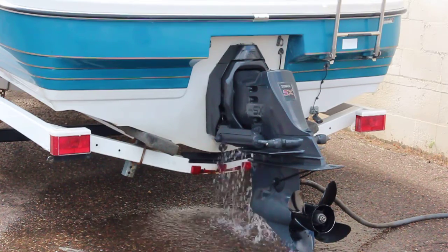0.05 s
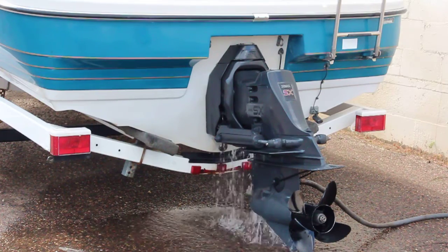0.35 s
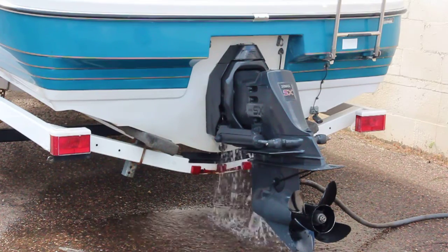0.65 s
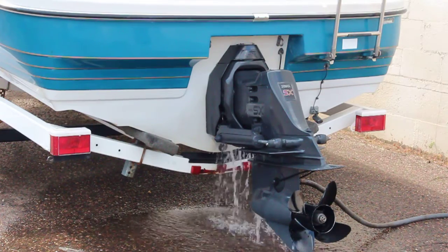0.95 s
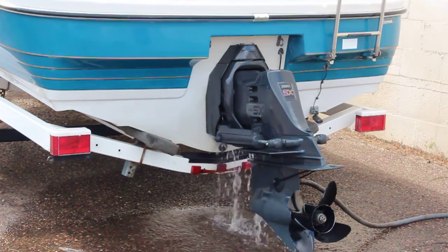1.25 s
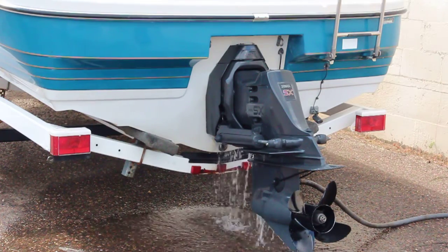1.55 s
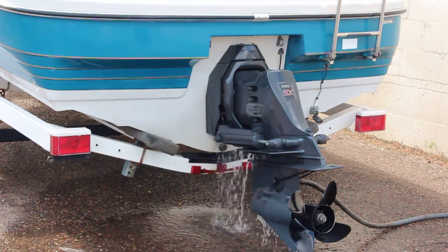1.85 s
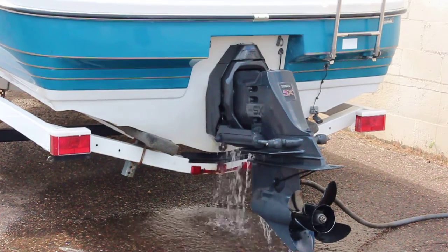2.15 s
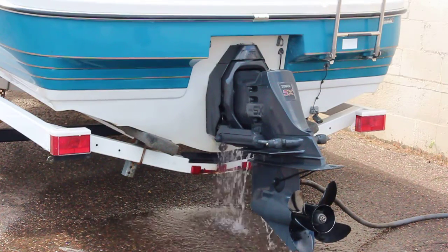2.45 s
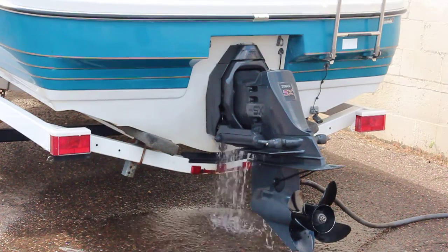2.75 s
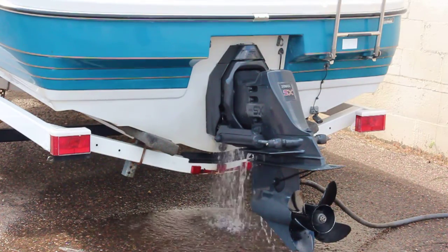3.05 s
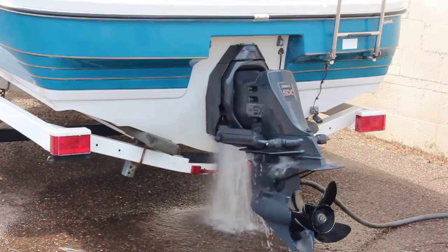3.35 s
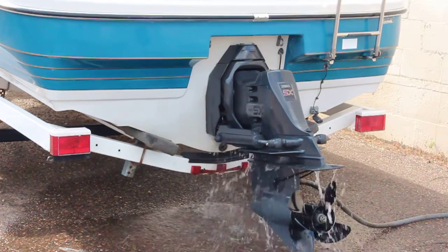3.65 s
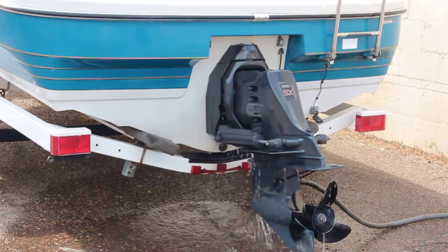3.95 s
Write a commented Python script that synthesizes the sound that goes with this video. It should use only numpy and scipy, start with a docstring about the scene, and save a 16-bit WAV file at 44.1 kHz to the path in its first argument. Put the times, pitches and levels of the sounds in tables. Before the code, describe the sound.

A boat engine idles, speeds up and revs once while water splashes onto pavement.

```python
"""On the pavement, a boat stands on its trailer, its V8 engine running with cooling water from a hose.
It lopes at idle, speeds up, is blipped once and falls back. The firings, one cylinder weak, form a pulse
train that excites the resonances of the wet exhaust pipe and the drive housing. At low speed each puff
modulates the water, which gurgles, spits and splashes on the ground; the blip blows it out as spray."""
import sys
import numpy as np
from scipy import signal
from scipy.fft import rfft, irfft
from scipy.io import wavfile
from scipy.ndimage import uniform_filter1d

SR = 44100
rng = np.random.default_rng(int(sys.argv[2]) if len(sys.argv) > 2 else 0)


def transcribe(signal):
    """Save signal, clipped to [-1, 1], as a 16-bit WAV file at the path in sys.argv[1]."""
    frames = np.atleast_2d(signal).T
    limited = np.clip(frames, -1, 1)
    pcm = np.round(limited * 32767).astype(np.int16)
    wavfile.write(sys.argv[1], SR, pcm)


N = 176400
T = np.arange(N) / SR


# firing rate (t/s, f/Hz)
FIRING_RATE = [(0.0, 43.5), (0.12, 42.5), (0.36, 40.7), (0.56, 45.6), (0.95, 71.2), (1.15, 77.9),
               (1.55, 82.4), (2.05, 105.3), (2.3, 114.9), (2.7, 141.5), (2.95, 155.4), (3.16, 171.3),
               (3.27, 203.9), (3.46, 328.0), (3.52, 327.2), (3.6, 315.4), (3.75, 265.8), (4.0, 200.5)]
# the eight cylinders in firing order (relative strength, delay/firing intervals)
CYLINDERS = [(0.97, 0.0), (0.38, 0.085), (1.04, 0.017), (1.14, 0.071), (0.88, 0.033), (0.72, 0.0055),
             (1.23, 0.0087), (1.17, .03)]
# irregularity of firing (t/s, weight of cylinder differences, weight of chance)
UNEVEN = [(0, 0.55, 0.23), (.55, 0.82, 0.4), (.72, 0.83, 0.24), (1.3, 0.69, 0.25), (2.0, 1.14, 0.17),
          (2.6, 0.82, 0.15), (3.15, 0.59, 0.099), (3.35, 2.9, 0.31), (3.5, 5.4, 0.84), (3.56, 0.43, 0.25),
          (4, 0.91, 0.029)]
def firings(jitter=0.13):
    """Impulse excitation: one pulse per firing, sized and timed by its cylinder and by chance."""
    phase = firing_phase()
    k = np.arange(int(phase[-1]))
    at = np.searchsorted(phase, k)
    strength, late = np.array(CYLINDERS)[k % len(CYLINDERS)].T
    chance = rng.standard_normal((len(k), 2))
    uneven, loose = curve(UNEVEN)[at], curve(UNEVEN, column=2)[at]
    size = np.maximum(1 + uneven * (strength - strength.mean()) + loose * chance[:, 0], 0)
    due = k + uneven * (late - late.mean()) + jitter * loose * chance[:, 1]
    place = np.interp(due, phase, np.arange(N)).clip(0, N - 2)
    whole, pulses = place.astype(int), np.zeros(N)
    pulses[whole] += size * (1 - place % 1)  # shared between two samples
    pulses[whole + 1] += size * (place % 1)
    return pulses


# pulse shape (t/s, second harmonic gain/dB, third harmonic gain/dB)
OVERTONES = [(0, -16, 6.5), (.6, 0, 7.5), (1.0, 6, -32), (1.5, 3, -7.5), (1.9, 0.5, 2.5), (2.3, -0.5, -2),
             (2.55, -4.5, -1.5), (2.75, -16.5, 3), (2.95, -15, 9.5), (3.15, 0, 3.5), (3.6, 5, 6.5),
             (4, 16, 5)]
def shape_pulses(pulses):
    """Interference: added cosines reinforce or weaken two harmonics of the pulse train."""
    harmonic_size, angle = 2 * curve(FIRING_RATE) / SR, 2 * np.pi * firing_phase()
    return pulses + sum(harmonic_size * (amp(curve(OVERTONES, column=n - 1)) - 1) * np.cos(n * angle)
                        for n in (2, 3))


# swing of the gas flow (t/s, depth/dB)
LOPE = [(.8, 2.3), (1.15, 4.3), (1.85, 4.8), (2.2, 2.8)]
def lope(peak_firing=2.99):
    """Amplitude modulation: the flow swells once per engine cycle of eight firings."""
    return amp(curve(LOPE) * np.cos(2 * np.pi * (firing_phase() - peak_firing) / len(CYLINDERS)))


# responses of the pipe, the drive housing and hull, and the burbling gas (f/Hz, gain/dB)
PIPE = [(10, -59.5), (25, -37), (42, -15), (65, -12), (85, -1.5), (105, 0.5), (130, 3.5), (160, -3.5),
        (185, -2.5), (220, 3), (262, -8.5), (300, 1.5), (325, -1), (375, -19.5), (440, -28.5), (530, -30.5),
        (700, -25.5), (1500, -67.5), (4000, -109.5)]
HOUSING = [(60, -73.5), (200, -28), (380, 2.5), (450, 8.5), (540, -9.5), (620, -4), (705, 6), (770, -9),
           (900, 4), (1030, -9), (1150, 0.5), (1320, -8), (1430, -6), (1520, -12), (1900, -17.5),
           (2700, -20), (3600, -16.5), (4500, -29.5), (15000, -63.5)]
BURBLE_COLOUR = [(15, -50), (40, -19.5), (100, -23.5), (170, -10.5), (230, 13), (315, -2), (380, -4.5),
                 (600, -42), (3000, -72.5)]
# boom of the pipe, sharp edge of the firings, turbulent gas (t/s, level/dB)
THUMP = [(0, -15.5), (.62, -16), (.69, -14.5), (.92, -13), (1.1, -14), (1.9, -13.5), (2.3, -13.5),
         (2.55, -12), (3.0, -14), (3.28, -14), (3.37, -21.5), (3.53, -17), (3.56, -12.5), (3.68, -12),
         (3.76, -13.5), (3.82, -11.5), (4, -15)]
BARK = [(0, -47), (1.6, -40), (2.1, -42), (2.8, -32), (3.54, -32.5), (3.63, -25), (3.8, -27.5), (4, -48)]
PUFF = [(0, -35.5), (.7, -37.5), (1.3, -28.5), (1.8, -30), (2.1, -33.5), (3.1, -29), (3.3, -27.5),
        (3.46, -22), (3.53, -24), (4, -28)]
def exhaust(pulses, burble_db=-5, rasp=0.7):
    """Forced resonance: firings and gas drive pipe and housing, burbling more as firing gets erratic."""
    beat, loose = shape_pulses(pulses), curve(UNEVEN, column=2)
    gas = rng.standard_normal(N) * gusts(pulses, decay_s=0.013, base=0.069, power=0.97) * lope()
    burble = steady(colour(gas, BURBLE_COLOUR)) * amp(burble_db) * loose / loose.max()
    thump = (burble - steady(colour(beat, PIPE))) * lope() ** 0.071 * amp(curve(THUMP))
    rough_beat = beat * (1 + rasp * flutter(width_hz=260))
    bark = steady(colour(rough_beat, HOUSING)) * amp(curve(BARK))
    puff = steady(colour(gas, HOUSING)) * amp(curve(PUFF))
    return thump - bark + puff


# misfires (t/s)
MISFIRES = [.745, 0.866, .985, 1.09]
def falter(depth_db=-6, width_s=0.012):
    """Loss of excitation: the level dips briefly at each misfire."""
    return amp(depth_db * sum(np.exp(-((T - at) / width_s) ** 2) for at in MISFIRES))


# hard firings at the top of the blip (t/s)
POPS = [3.457, 3.482, 3.505]
def pops(boom_db=-9, crack_db=-13):
    """Impulse response: single hard firings boom in the pipe and crack against the housing."""
    clicks = np.zeros(N)
    clicks[(np.array(POPS) * SR).astype(int)] = 1
    boom, crack = colour(clicks, PIPE), colour(clicks, HOUSING)
    return amp(boom_db) * boom / abs(boom).max() + amp(crack_db) * crack / abs(crack).max()


# deep bass of the engine (t/s, gain/dB)
BASS = [(0, 8), (1, 0), (2.2, -2.5), (3.1, 2.5), (3.5, -8), (3.57, -23), (4, -20)]
def bass_shelf(x, corner_hz=85):
    """Shelving filter: the bass is strong at idle and falls away once the throttle shuts."""
    low = signal.sosfiltfilt(signal.butter(3, corner_hz, fs=SR, output="sos"), x)
    return x + low * (amp(curve(BASS)) - 1)


def gulp(start=0.672, hz=250, db=-8):
    """Damped oscillation: the pipe booms for a moment as a slug of water clears it."""
    return amp(db) * swell(start, peak_s=0.011) ** 2 * np.sin(2 * np.pi * hz * (T - start))


# water gurgling in the outlet (t/s, level/dB)
GURGLE = [(0, -30), (.7, -26.5), (1.0, -30.5), (1.25, -28.5), (1.72, -30.5), (2.05, -35), (2.5, -45.5),
          (4, -58)]
# spectral shape of churned water (f/Hz, gain/dB)
WATER_COLOUR = [(150, -37.5), (480, -19), (630, 3), (712, 9), (770, -1.5), (950, 5), (1050, -7), (1160, 2),
                (1500, -10.5), (1570, 4.5), (1640, -10.5), (1705, 5.5), (1770, -18.5), (1880, -11),
                (2050, -7), (2330, -5), (2600, -10), (3500, -8), (4500, -22), (6000, -30), (15000, -47)]
POCKET_WIDTH_HZ = 230
def gurgle(pulses, bubbles_per_s=1500, spread_db=2.4, life_s=0.0055, pitches=44):
    """Bubble resonance: puffs churn the water, and each bursting gas pocket rings briefly."""
    age, bubbles = np.arange(0, 0.08, 1 / SR), np.zeros(N)
    envelope = age * np.exp(-age / life_s)
    onsets = rng.random(N) < bubbles_per_s / SR
    sizes = onsets * amp(spread_db * np.minimum(rng.exponential(1, N), 3.5))
    pitch = rng.integers(0, pitches, N)
    for k, hz in enumerate(np.geomspace(600, 6300, pitches)):
        tone = np.sqrt(hz) * flutter(POCKET_WIDTH_HZ) * np.sin(2 * np.pi * hz * T)
        bubbles += tone * signal.oaconvolve(sizes * (pitch == k), envelope)[:N]
    flow = gusts(pulses, decay_s=0.015, base=0.71, power=0.69) * lope() ** 0.55
    return steady(colour(unit(bubbles) * flow, WATER_COLOUR), size=9000) * amp(curve(GURGLE))


# the largest gas pockets (t/s, f/Hz, level/dB)
POCKETS = [(.138, 3490, -29.5), (.378, 2450, -33), (.424, 3060, -25.5), (.716, 1590, -28),
           (0.909, 3440, -24), (1.134, 1223, -21.5), (1.161, 4090, -33), (1.328, 1730, -30),
           (1.617, 2290, -28), (2.335, 1297, -28)]
def large_pockets(life_s=0.0058):
    """Narrow-band transients: single big pockets burst with a brief, rough pitch."""
    return sum(amp(db) * swell(start, life_s) * flutter(POCKET_WIDTH_HZ) * np.sin(2 * np.pi * hz * T)
               for start, hz, db in POCKETS)


# fine spray, single splats, crackle of the exhaust at the blip (t/s, level/dB)
SPRAY = [(0, -43), (.7, -43.5), (1.02, -46), (1.28, -43.5), (1.76, -47), (1.9, -48.5), (2.1, -53.5),
         (2.5, -53), (3.25, -49), (3.45, -38.5), (3.54, -45.5), (4, -51.5)]
SPLATS = [(.428, -47), (.628, -44.5), (0.696, -44), (.832, -48), (1.1, -55), (1.215, -50), (1.318, -54),
          (1.497, -51), (1.562, -42), (1.6, -47), (1.685, -53), (1.746, -46), (1.782, -53)]
CRACKLE = [(3.2, -62), (3.46, -31), (3.6, -70)]
# spectral shape of the spray (f/Hz, gain/dB)
SPRAY_COLOUR = [(500, 6.5), (2000, -15), (4000, 0), (8000, -6), (10000, -10.5), (12500, -9.5), (15500, -18)]
def spatter(pulses, slosh_db=11, splat_s=0.0072):
    """Impact noise: drops, mist and splats hit the pavement; at the blip the exhaust crackles."""
    splats = sum(amp(db) * swell(start, splat_s) for start, db in SPLATS)
    flow = steady(gusts(pulses, decay_s=0.013, base=0.73, power=1.14))
    spray = flow * amp(curve(SPRAY)) * lope() ** 0.15
    fine = unit(colour(drops() + rng.standard_normal(N), SPRAY_COLOUR))
    coarse = unit(np.gradient(colour(drops(), WATER_COLOUR)))
    return fine * (spray + splats) + coarse * (amp(slosh_db) * splats + amp(curve(CRACKLE)))


def drops(per_s=2600, spread_db=4):
    """Shot noise: drops click at random times, a few of them loudly."""
    clicks = (rng.random(N) < per_s / SR) * rng.choice([-1, 1], N)
    return unit(clicks * amp(spread_db * np.minimum(rng.exponential(1, N), 5)))


# machinery inside the hull (t/s, level/dB)
WHIRR = [(0, -36), (2.1, -39.5), (2.45, -32.5), (3.1, -36), (3.45, -29.5), (3.6, -38), (4, -33.5)]
# its spectral shape (f/Hz, gain/dB)
WHIRR_COLOUR = [(30, -22.5), (150, -6.5), (500, 8), (1300, 2), (1900, -0.5), (2800, 3.5), (3800, -7),
                (4800, -17.5), (10000, -30), (12400, -37), (15500, -29)]
def whirr():
    """Broadband noise: belt, valves and intake merge into an even whirr."""
    return unit(colour(rng.standard_normal(N), WHIRR_COLOUR)) * amp(curve(WHIRR))


def firing_phase():
    """Phase as the integral of frequency, counted in firings."""
    return np.cumsum(curve(FIRING_RATE)) / SR


def gusts(pulses, decay_s, base, power):
    """Exponential relaxation: gas flow surges at each firing and dies away to a base flow."""
    pole = np.exp(-1 / (SR * decay_s))
    flow = np.abs(signal.lfilter([1], [1, -pole], pulses)) ** power
    return base + steady(uniform_filter1d(flow, size=60))


def flutter(width_hz):
    """Random modulation: low-pass noise of rms 1 that spreads a tone over width_hz."""
    return unit(signal.lfilter(*signal.butter(2, width_hz / 2, fs=SR), rng.standard_normal(N)))


def swell(start, peak_s):
    """Critically damped envelope: rises to 1 and dies away."""
    age = np.maximum(T - start, 0) / peak_s
    return age * np.exp(1 - age)


def colour(x, response, size=8192):
    """Minimum-phase filter: folding the cepstrum makes the response causal."""
    hz, db = np.transpose(response)
    log_hz = np.log(np.fft.rfftfreq(size, 1 / SR) + 1)
    cepstrum = irfft(np.log(amp(np.interp(log_hz, np.log(hz), db))))
    cepstrum[1:size // 2] *= 2
    cepstrum[size // 2 + 1:] = 0
    impulse_response = irfft(np.exp(rfft(cepstrum)))[:size // 2]
    return signal.fftconvolve(x, impulse_response)[:N]


def steady(x, size=6000):
    """Running normalisation: removes slow changes of level, leaving rms near 1."""
    power = uniform_filter1d(uniform_filter1d(x ** 2, size), size)
    return x / np.sqrt(abs(power) + 1e-14)


def curve(points, column=1):
    """Linear interpolation of one column of a time table."""
    rows = np.array(points)
    return np.interp(T, rows[:, 0], rows[:, column])


def amp(db):
    """Amplitude ratio from decibels."""
    return 10 ** (np.asarray(db) / 20)


def unit(x):
    """Normalisation to rms 1."""
    return x / np.sqrt(np.mean(x ** 2) + 1e-20)


def scene():
    """Superposition: engine and water add, alike in both channels."""
    pulses = firings()
    engine = bass_shelf(exhaust(pulses) * falter() + whirr() + pops())
    water = gulp() + gurgle(pulses) * falter() + large_pockets() + spatter(pulses)
    mono = engine + water
    return np.array([mono, mono])


def record(dry):
    """Band limiting: a linear-phase low-pass removes the highest treble."""
    lowpass = signal.firwin(511, cutoff=15750, window=("kaiser", 9), fs=SR)
    return signal.oaconvolve(dry, lowpass[None], "same")


dry = scene()
out = record(dry)
transcribe(out)
```